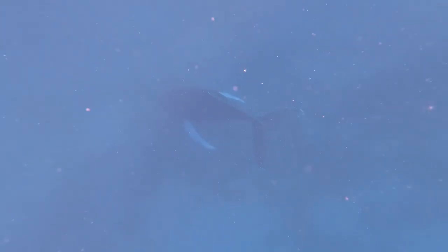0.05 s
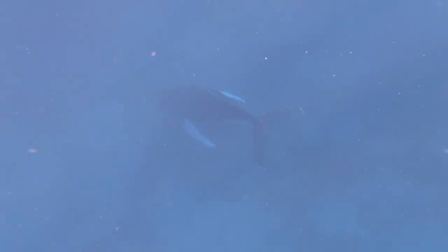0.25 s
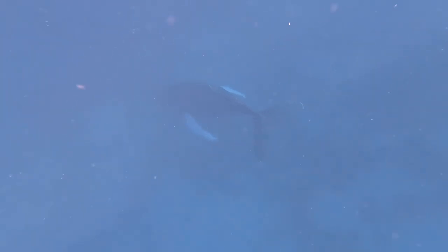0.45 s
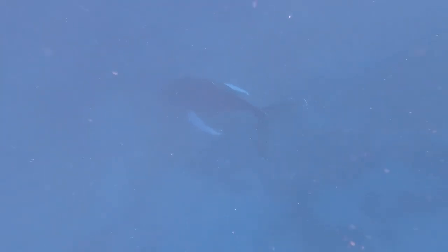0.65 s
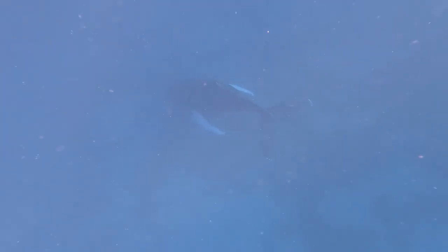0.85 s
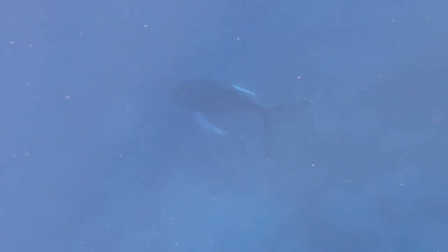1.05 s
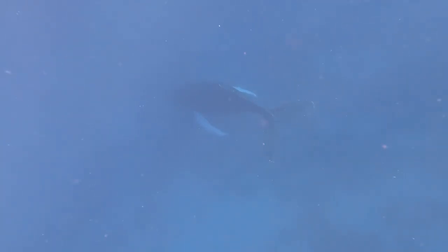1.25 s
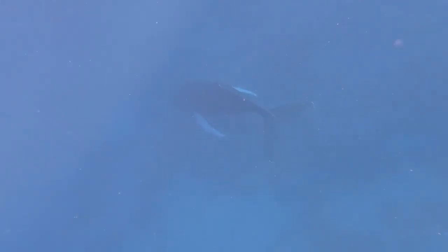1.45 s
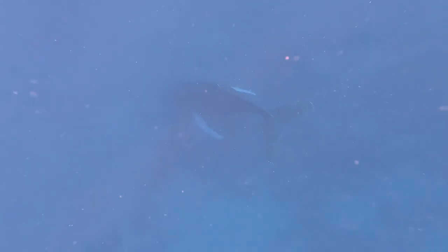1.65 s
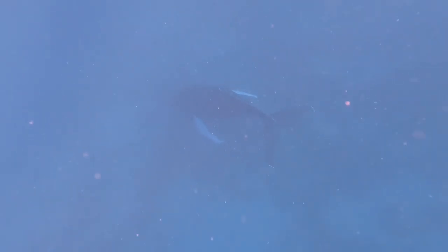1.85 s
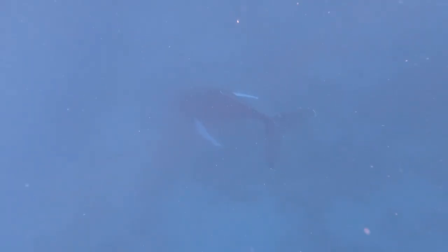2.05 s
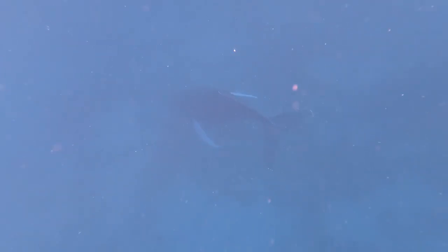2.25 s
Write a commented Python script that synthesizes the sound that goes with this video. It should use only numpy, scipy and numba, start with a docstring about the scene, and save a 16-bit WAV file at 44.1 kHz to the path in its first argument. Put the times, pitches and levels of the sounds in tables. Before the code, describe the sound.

A humpback whale gives one low moan underwater, sinking into a rough growl amid bubbling crackle

```python
"""Under water, a humpback whale gives one low moan: it swells, arches in pitch and sinks into a rough growl.
A pulse train excites throat and nasal resonances above a hum of two partials; the growl adds two more.
Faint gliding sines sound as more distant song. Decaying sines make bubbles plink, low knocks and, after
the moan, a short grunt of a rising low partial and a higher one. Coloured noise makes a low wash and
rumble; a dense scatter of tiny bubbles, ticks and snaps makes the crackle."""
import sys
import numpy as np
from scipy import signal
from scipy.fft import rfft, irfft
from scipy.io import wavfile
from scipy.ndimage import uniform_filter1d
from numba import njit

SR = 44100
rng = np.random.default_rng(int(sys.argv[2]) if len(sys.argv) > 2 else 0)


def store_pcm(level_fs):
    """Save levels as 16-bit WAV."""
    pcm = np.round(np.clip(level_fs, -1, 1) * 32767).astype(np.int16)
    wavfile.write(sys.argv[1], SR, np.atleast_2d(pcm).T)


N = 101429

BUBBLE_RISE_S = .0012


def undb(db):
    """Level to amplitude: 20 dB is a factor of ten."""
    return 10 ** (np.asarray(db) / 20)


def unit(x):
    """Normalisation of the mean power: scale to rms 1."""
    return x / np.sqrt(np.mean(x ** 2))


def curve(table):
    """Linear interpolation in time of each column after the first."""
    times, *columns = np.array(table, float).T
    return [np.interp(np.arange(N) / SR, times, c) for c in columns]


def walk(rate):
    """Low-passed noise: white noise averaged twice over 1 / rate seconds, with rms 1."""
    k = max(int(SR / rate), 1)
    smooth = uniform_filter1d(rng.standard_normal(N), k)
    return unit(uniform_filter1d(smooth, k))


def colour(x, points):
    """Minimum-phase filtering: folding the cepstrum makes a causal response through (Hz, dB) points."""
    size = 8192
    hz, db = np.array(points, float).T
    log_hz = np.log(np.fft.rfftfreq(size, 1 / SR) + 1)
    log_gain = np.log(undb(np.interp(log_hz, np.log(hz), db)))
    cepstrum = irfft(log_gain)
    cepstrum[1:size // 2] *= 2
    cepstrum[size // 2 + 1:] = 0
    response = irfft(np.exp(rfft(cepstrum)))
    return signal.fftconvolve(x, response)[:N]


def fade(t, t60):
    """Exponential damping: a decay by 60 dB in t60 seconds."""
    return np.exp(-np.log(1000) * t / t60)


def add(out, start, sound):
    """Superposition: mix a sound in from a start time in seconds."""
    i = max(int(start * SR), 0)
    out[i:i + len(sound)] += sound[:max(N - i, 0)]


@njit
def resonance(x, hz, width):
    """Resonance of a second-order system: a state-variable band-pass with a moving centre."""
    y, band, low = np.empty(len(x)), 0., 0.
    for i in range(len(x)):
        g, k = np.tan(np.pi * hz[i] / SR), width / hz[i]
        v = (band + g * (x[i] - low)) / (1 + g * (g + k))
        band, low, y[i] = 2 * v - band, low + 2 * g * v, k * v
    return y


def echoes(x, t60):
    """Diffuse reverberation: convolution with decaying noise of unit energy after a 2 ms gap."""
    t = np.arange(SR) / SR
    response = rng.standard_normal(SR) * fade(t, t60) * (t > .002)
    return signal.fftconvolve(x, response / np.sqrt(np.sum(response ** 2)))[:N]


def ringing(table, rise_s):
    """Damped oscillation: tones that swell quickly, glide in pitch and die away."""
    out, t = np.zeros(N), np.arange(SR // 8) / SR
    for start, hz, db, t60, glide in table:
        # The glide stops halfway through the decay time
        pitch = hz * 2 ** (glide * np.minimum(t, t60 / 2))
        shape = (1 - np.exp(-(t / rise_s) ** 2)) * fade(t, t60)
        tone = np.sin(2 * np.pi * np.cumsum(pitch) / SR)
        add(out, start, undb(db) * shape / shape.max() * tone)
    return out


def burst(db, t60, points):
    """Impulsive noise: a decaying burst, coloured and scaled to a given peak level."""
    crack = colour(rng.standard_normal(N) * fade(np.arange(N) / SR, t60), points)
    return undb(db) * crack / np.abs(crack).max()


def water():
    """Filtered random noise: a flickering wash and a low rumble of moving water."""
    # Spectra of wash and rumble. Each row: frequency in Hz, relative density in dB per Hz
    wash_colour = [(40, 5), (130, -10), (270, -0.5), (420, -7), (850, -10), (1620, -5), (1970, -11.5),
                   (2300, -48), (2600, -18.5), (3800, -42.5), (5500, -83)]
    rumble_colour = [(30, 21.5), (60, 13), (130, -25.5), (300, -54.5)]
    # Levels of wash and rumble. Each row: time in seconds, level in dB
    wash_level = [(.05, -36), (.5, -30.5), (.8, -27), (1.15, -38.5), (1.6, -31), (1.8, -42), (2.03, -34.5),
                  (2.22, -35.5), (2.28, -28.5)]
    rumble_level = [(.7, -47), (.85, -29), (1.45, -30.5), (1.6, -35.5), (1.85, -34), (2, -55)]
    flicker_db = walk(34)
    wash = unit(colour(rng.standard_normal(N), wash_colour))
    wash = wash * undb(curve(wash_level)[0] + flicker_db)
    rumble = unit(colour(rng.standard_normal(N), rumble_colour))
    return wash + rumble * undb(curve(rumble_level)[0])


def crackle():
    """Random superposition of small events: bubbles falling in pitch, ticks and snaps."""
    # Transmission of fizz and ticks through the housing. Each row: frequency in Hz, gain in dB
    housing = [(300, -13.5), (1650, 6), (2300, -9), (2650, -14.5), (3800, -7), (4600, -19), (5500, -38.5),
               (7000, -25), (9000, -84.5)]
    # Each row: time in seconds, level of the fizz in dB
    level = [(0, -48.5), (.5, -34.5), (1.1, -48.5), (1.8, -46), (2.05, -36.5), (2.3, -49.5)]
    # Each row: start of a sharp snap in seconds, peak level in dB
    snaps = [(.2055, -14), (2.018, -16), (2.063, -15)]
    # Spectrum of the snaps. Each row: frequency in Hz, relative level in dB
    snap_colour = [(700, -25), (1600, 0), (3600, -8), (6000, -62)]
    fizz_per_s, low_hz, high_hz = 240, 1458, 3915
    glide_octaves_per_s, spread_db, fizz_t60_s = -5.5, 6.5, .014
    ticks_per_s, ticks_to_fizz_db, snap_t60_s = 1800, -2.5, .008

    draws = rng.random((1500, 3))
    # Exponential waiting times between bubbles
    starts = np.cumsum(-np.log(draws[:, 0])) / fizz_per_s
    pitch = low_hz * (high_hz / low_hz) ** draws[:, 1]
    size_db = spread_db * np.minimum(-np.log(draws[:, 2]), np.pi)
    tiny = [(s, hz, db, fizz_t60_s, glide_octaves_per_s)
            for s, hz, db in zip(starts, pitch, size_db) if s < N / SR]
    fizz = ringing(tiny, BUBBLE_RISE_S / 2)
    impulses = (rng.random(N) < ticks_per_s / SR) * rng.standard_t(3, N)
    ticks = echoes(impulses, .005)
    mix = unit(colour(fizz, housing)) + undb(ticks_to_fizz_db) * unit(colour(ticks, housing))
    out = mix * undb(curve(level)[0])
    for start, db in snaps:
        add(out, start, burst(db, snap_t60_s, snap_colour))
    return out


def bubbles_knocks_and_grunt():
    """Damped oscillation: reverberant bubble plinks, dry low knocks and a grunt; a noise burst thuds."""
    # Bubbles. Each row: start in seconds, pitch in Hz, peak level in dB, glide in octaves per second
    plink_table = [(.013, 960, -19.5, -14), (0.019, 1470, -19, -6.5), (0.206, 2670, -26, -15),
                   (0.2219, 1367, -12.5, -24), (.268, 1610, -14.5, 8.5), (0.289, 1430, -17.5, -14),
                   (0.3977, 1638, -22.5, -6), (.412, 2050, -22, -11.5), (0.42, 3610, -29.5, -17.5),
                   (0.434, 1737, -14.5, -15), (0.436, 1180, -18.5, -3), (0.45, 1647, -16.5, -7.5),
                   (0.4977, 1620, -13, -27.5), (0.5106, 1717, -11, -28), (0.512, 2720, -23, -10),
                   (0.604, 1516, -14, 5.5), (0.645, 2053, -16.5, -7), (1.9943, 1590, -16.5, 5),
                   (2.012, 1123, -18, 32), (2.018, 1820, -17, 0), (2.044, 1542, -14.5, 13),
                   (2.0809, 1580, -18, -3.5), (2.2542, 2680, -25, -14), (2.273, 1590, -42, 6)]
    # Low knocks, then a short grunt near 1.9 s made of a rising low partial and a higher one.
    # Each row: start in seconds, pitch in Hz, peak level in dB, 60 dB decay time in seconds,
    # glide in octaves per second
    low_tones = [(1.72, 277, -20, .025, 53), (1.7645, 307, -13, 0.029, 21), (1.828, 310, -19.5, 0.028, 0),
                 (1.9, 110, -22.5, 0.35, 20), (1.912, 301, -17, 0.048, -2)]
    # Spectrum of the thud on the housing. Each row: frequency in Hz, relative level in dB
    thud_colour = [(110, 12), (400, 4), (1200, -4), (4000, -59)]
    bubble_t60_s, low_rise_s = .029, 0.00079
    thud_s, thud_db, thud_t60_s = .514, -7.5, 0.012

    rows = [(start, hz, db, bubble_t60_s, glide) for start, hz, db, glide in plink_table]
    plinks = ringing(rows, BUBBLE_RISE_S)
    dry_mix = plinks + ringing(low_tones, low_rise_s)
    add(dry_mix, thud_s, burst(thud_db, thud_t60_s, thud_colour))
    return dry_mix + undb(-10.5) * echoes(plinks, 0.2)


def song():
    """Frequency modulation: faint gliding sines from farther away, with diffuse echoes."""
    # Each row: start in seconds, length in seconds, start, middle and end pitch in Hz,
    # rms level at the crest in dB
    notes = [(0.39, 0.16, 235, 288.8, 301, -36), (0.503, .14, 555, 636.7, 575, -31.5),
             (0.661, .15, 579, 557.7, 566, -34.5), (0.794, 0.11, 630, 610, 640, -33.5)]
    out = np.zeros(N)
    for start, length, *hz, db in notes:
        u = np.linspace(0, 1, int(length * SR))
        # A parabola through the three pitches
        pitch = np.polyval(np.polyfit([0, .5, 1], hz, 2), u)
        swell = np.sqrt(2 * np.abs(np.sin(np.pi * u)))
        add(out, start, undb(db) * swell * np.sin(2 * np.pi * np.cumsum(pitch) / SR))
    return out + undb(-7) * echoes(out, 0.14)


def whale():
    """Source and filter: irregular pulses and rasp excite throat and nasal resonances above a hum."""
    # Each row: time in seconds, pulse rate in Hz
    pulse_rate = [(.55, 77.98), (.882, 78.02), (.954, 81.37), (1.11, 83.42), (1.208, 81.5), (1.304, 77.35),
                  (1.37, 70.85), (1.42, 62.57), (1.49, 51.33), (1.6, 47.93)]
    # Each row: time in seconds, levels of fundamental, octave and buzz in dB, roughness (clipped to 0-1)
    moan = [(.54, -47, -59, -41, 0.1), (.62, -36, -30.5, -41, 0), (.81, -25, -16, -32, 0.3),
            (.88, -23, -14, -19.5, 0.6), (.96, -23.5, -13.5, -17.5, 0.2), (1.12, -20.5, -13.5, -16, 0.1),
            (1.22, -20.5, -15.5, -20, 0.3), (1.29, -18.5, -17, -17.5, 0.6), (1.38, -17.5, -20, -15.5, 1.1),
            (1.44, -28.5, -21, -18, 0.7), (1.53, -30, -17, -28, 0.9), (1.61, -45.5, -42, -41.5, 0.9)]
    # Each row: time in seconds, centre of the nasal resonance in Hz
    nasal_centre = [(.88, 1159), (.94, 1360), (1.02, 1271), (1.2, 1576), (1.275, 1082), (1.37, 1507)]
    # Spectral filter of the pulses. Each row: frequency in Hz, relative gain in dB
    throat_colour = [(130, -27.5), (250, 2.5), (335, -6), (415, -13), (680, -9.5), (850, -14.5), (1100, -4),
                     (1400, -1), (1660, 4), (1800, -18.5), (2030, -19.5), (2280, -47.5), (2600, -31),
                     (3600, -47), (5500, -82.5)]
    # Overtones that swell in the growl. Each row: time in seconds, level of the fifth partial in dB
    growl = [(1.33, -56.5), (1.44, -22), (1.49, -47.5), (1.55, -32.5), (1.61, -43.5)]
    nasal_width_hz, nasal_share, growl_third_db, hum_wobble = 380, 1.7, 1, .3
    jitter_s, shimmer_db, rasp_share, rasp_cycles = 0.00018, 3.5, 1, 1
    # A weaker rebound follows each pulse, irregular in its delay
    rebound_s, rebound_jitter_s, rebound_db = .0056, 0.00011, -7
    buzz_lead_s, echo_db, echo_t60_s = .0005, -8.5, .3

    t = np.arange(N) / SR
    cycles = np.cumsum(curve(pulse_rate)[0]) / SR
    first_db, octave_db, buzz_db, rough = curve(moan)
    rough = np.clip(rough, 0, 1)
    growl_db = curve(growl)[0]
    partials = ((1, first_db), (2, octave_db), (3, growl_db + growl_third_db), (5, growl_db))
    hum = 0
    for order, db in partials:
        wobble = 1 + hum_wobble * rough * walk(70)
        hum = hum + np.sqrt(2) * undb(db) * wobble * np.cos(2 * np.pi * order * cycles)

    beats = np.interp(np.arange(1, int(cycles[-1])), cycles, t)
    pulses, taps = np.zeros(N + 32), np.arange(-8, 9)
    for when, (late, size, stray) in zip(beats, rng.standard_normal((400, 3))):
        r = np.interp(when, t, rough)
        main = (jitter_s * r * late, 0)
        rebound = (rebound_s + rebound_jitter_s * stray, rebound_db)
        for lag, db in (main, rebound):
            at = (when + lag) * SR
            # A sinc places the pulse between samples
            pulses[int(at) + taps] += undb(db + shimmer_db * r * size) * np.sinc(taps - at % 1)

    # Noise that decays within each cycle
    rasp = unit(np.exp(-(cycles % 1) / rasp_cycles) * rng.standard_normal(N))
    rasp_gain = rasp_share * rough ** 2
    source = (unit(pulses[:N]) + rasp_gain * rasp) / np.hypot(1, rasp_gain)
    throat = np.roll(colour(source, throat_colour), -int(buzz_lead_s * SR))
    nasal = resonance(throat, curve(nasal_centre)[0], float(nasal_width_hz))
    buzz = undb(buzz_db) * unit(throat + nasal_share * nasal)
    sounding = 1. * ((t > moan[0][0]) & (t < moan[-1][0]))
    sounding = uniform_filter1d(sounding, size=800)
    return (hum + buzz) * sounding + undb(echo_db) * echoes(buzz * sounding, echo_t60_s)


def scene():
    """Superposition of all pressures at one underwater microphone."""
    return (water() + crackle() + bubbles_knocks_and_grunt() + song() + whale())[None]


def record(dry):
    """Band limiting: an elliptic low-pass at 14.4 kHz cuts the top."""
    lowpass = signal.ellip(8, .2, 70, 14400, fs=SR, output="sos")
    return signal.sosfilt(lowpass, dry)


dry = scene()
out = record(dry)
store_pcm(out)
```